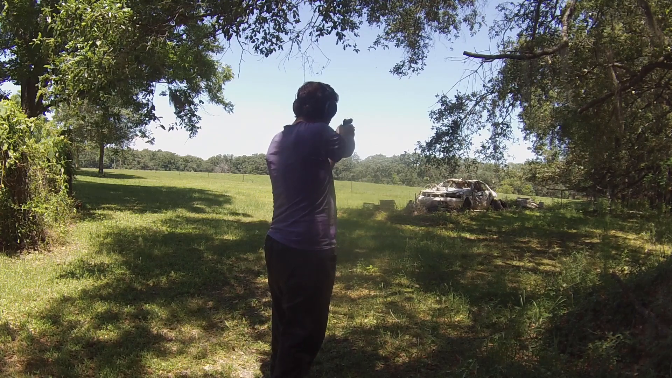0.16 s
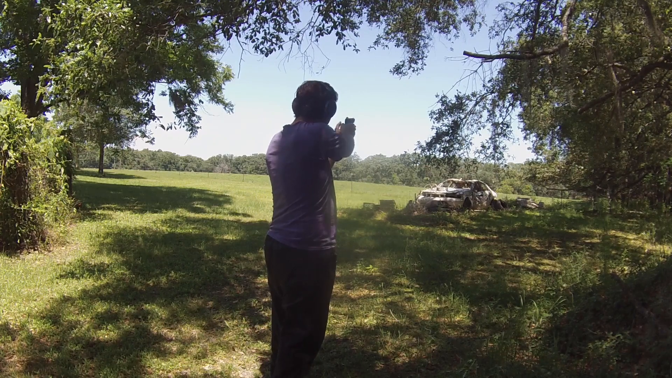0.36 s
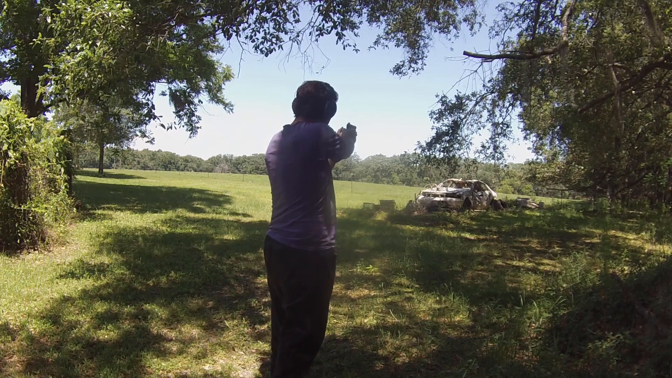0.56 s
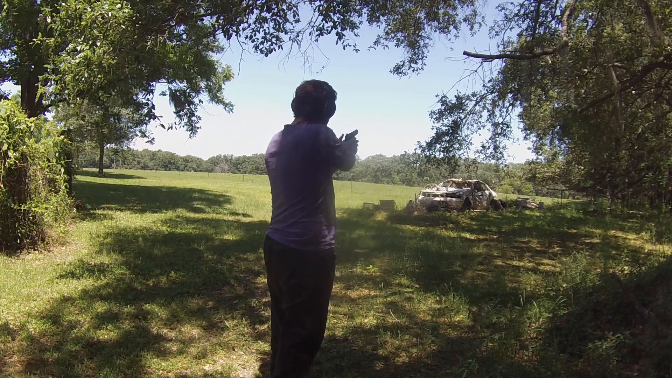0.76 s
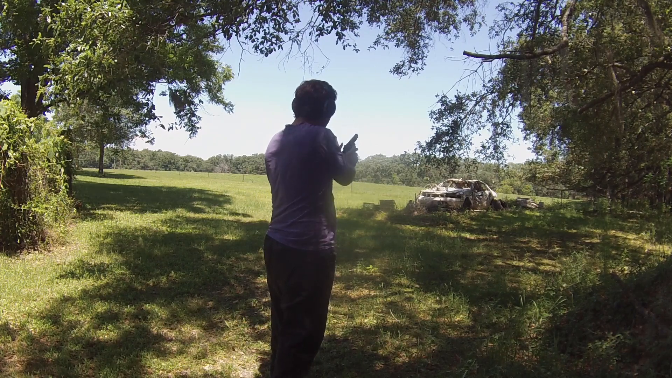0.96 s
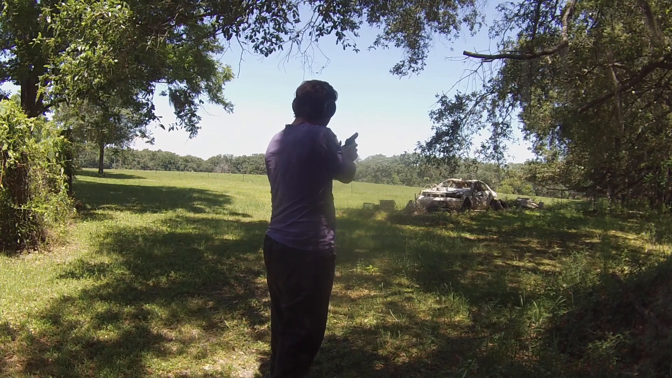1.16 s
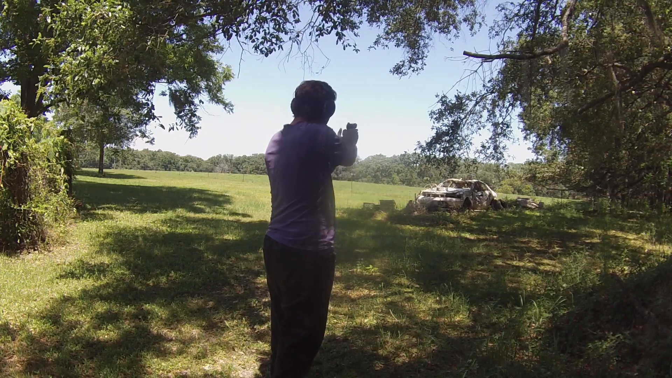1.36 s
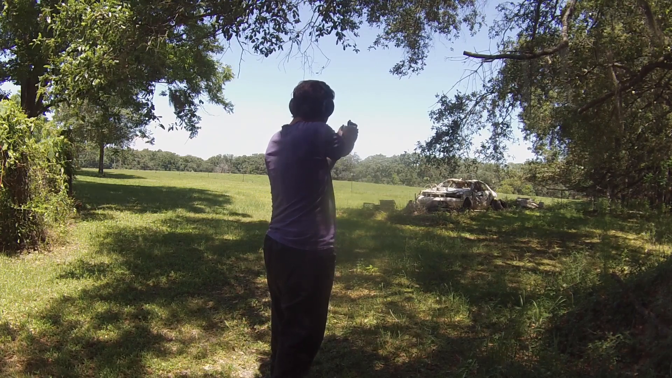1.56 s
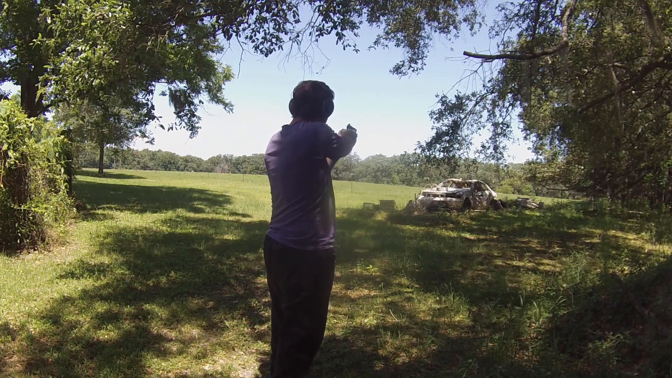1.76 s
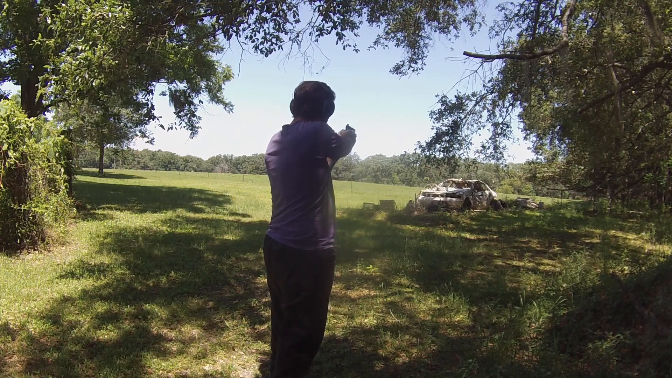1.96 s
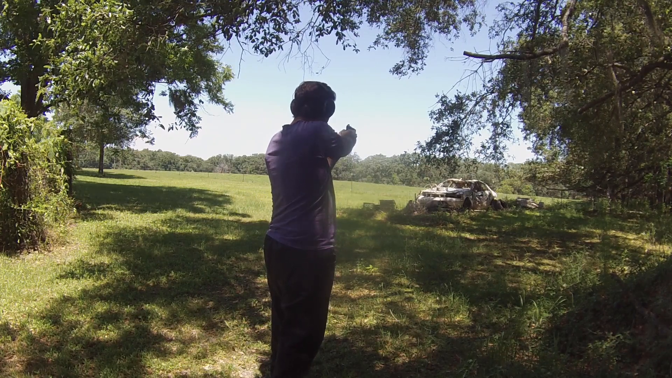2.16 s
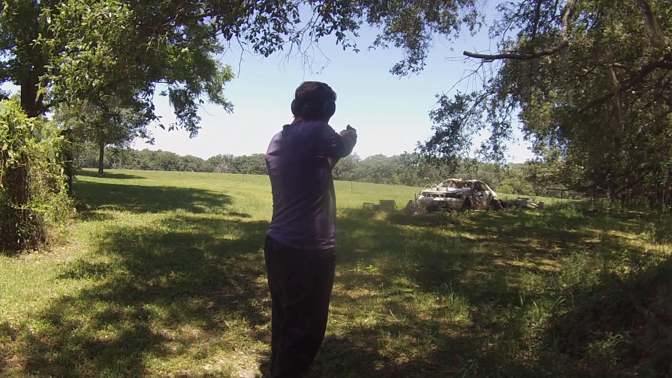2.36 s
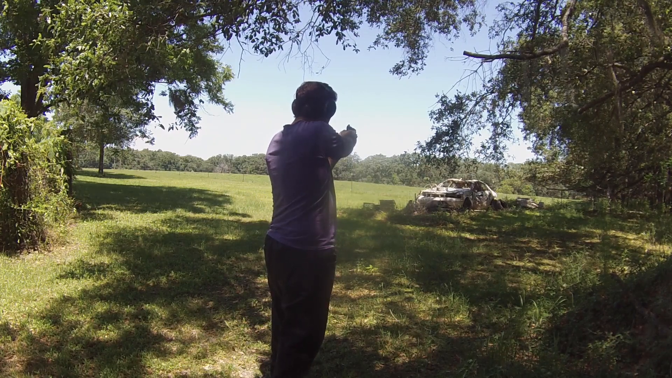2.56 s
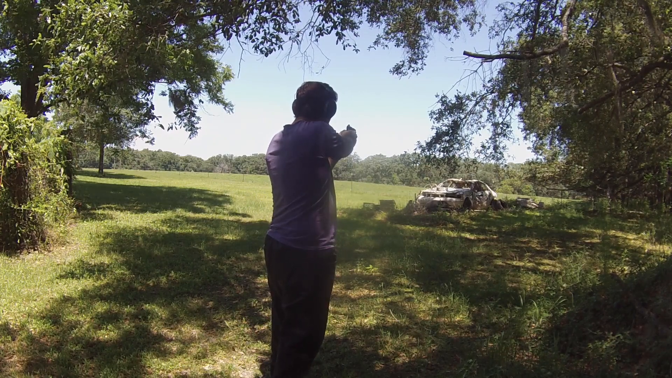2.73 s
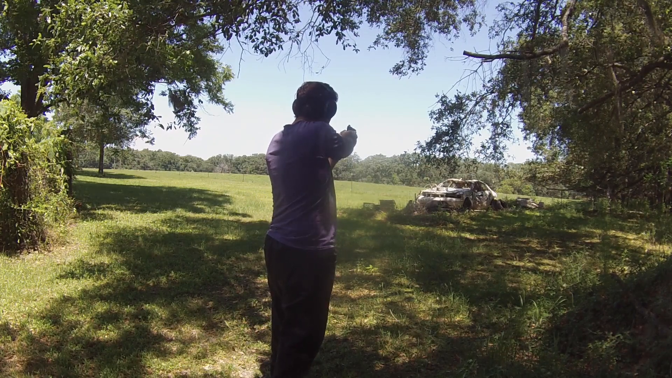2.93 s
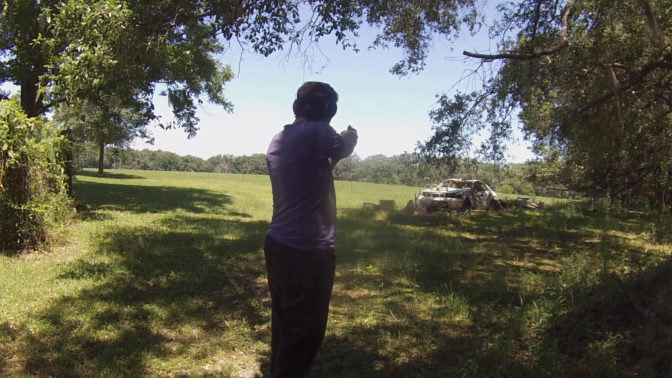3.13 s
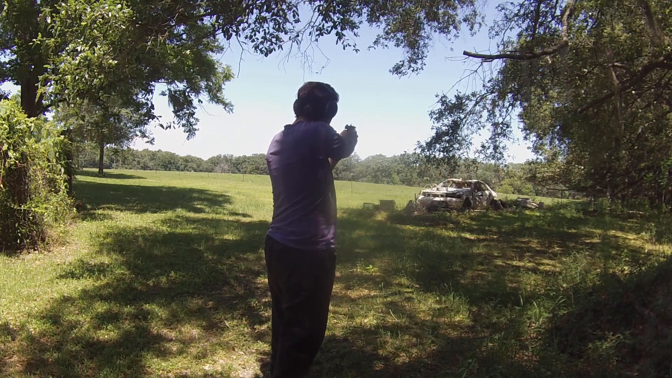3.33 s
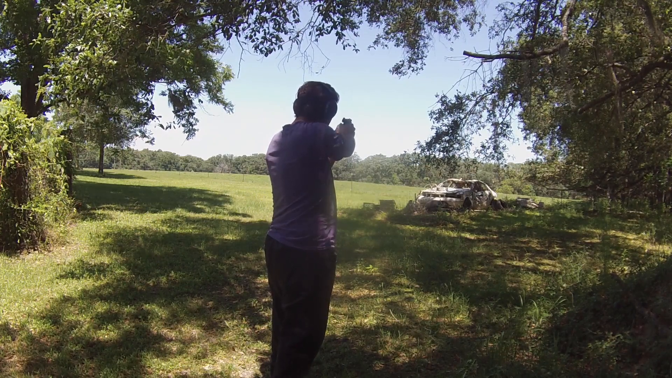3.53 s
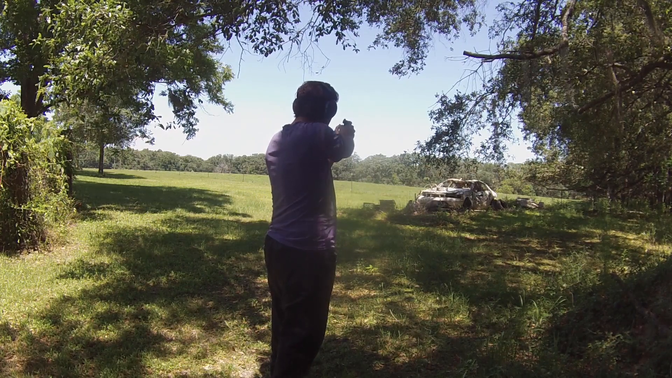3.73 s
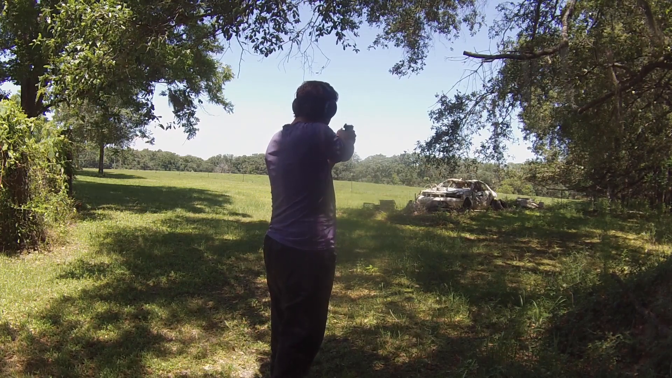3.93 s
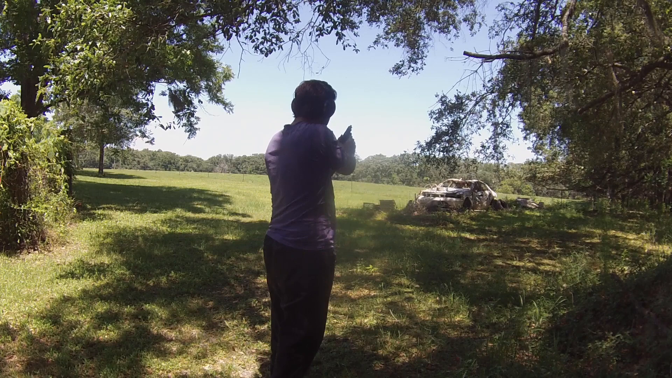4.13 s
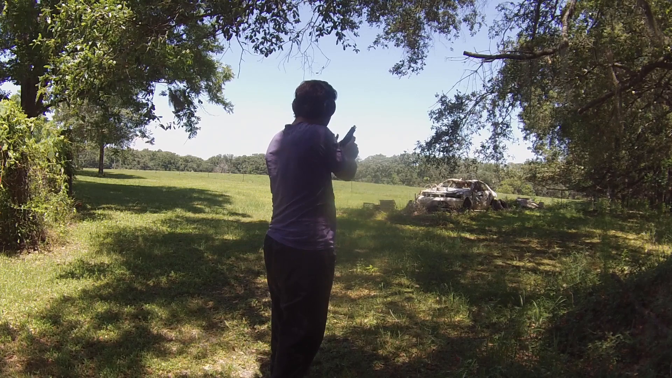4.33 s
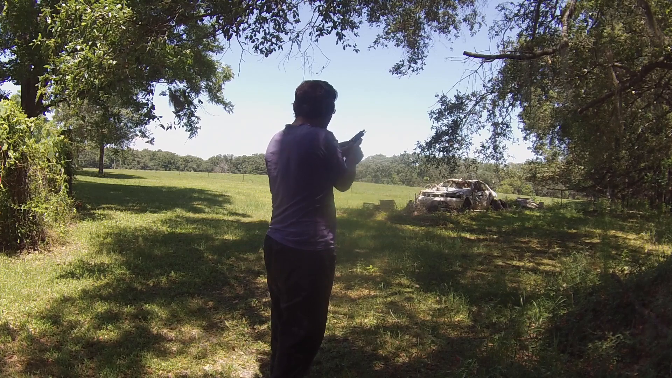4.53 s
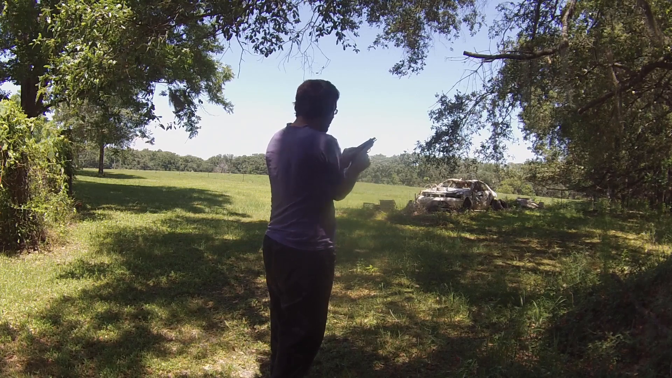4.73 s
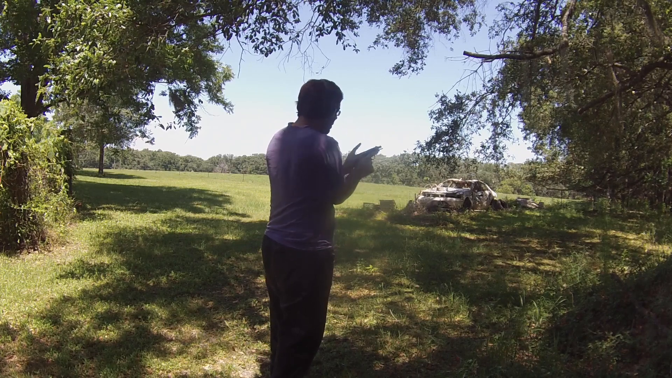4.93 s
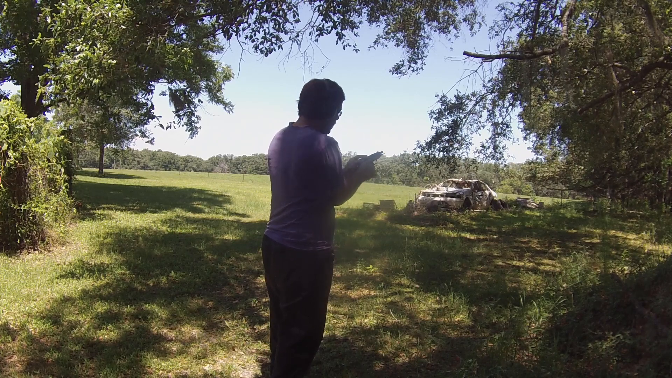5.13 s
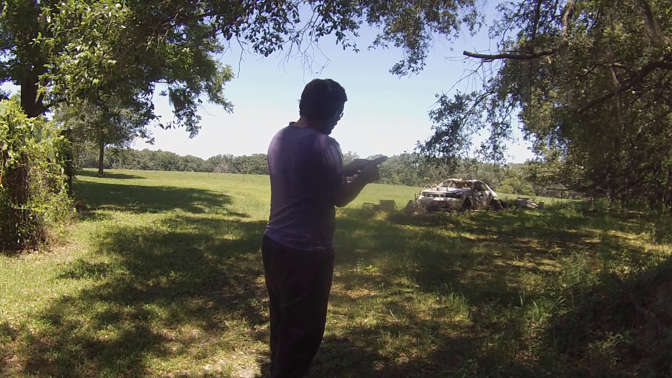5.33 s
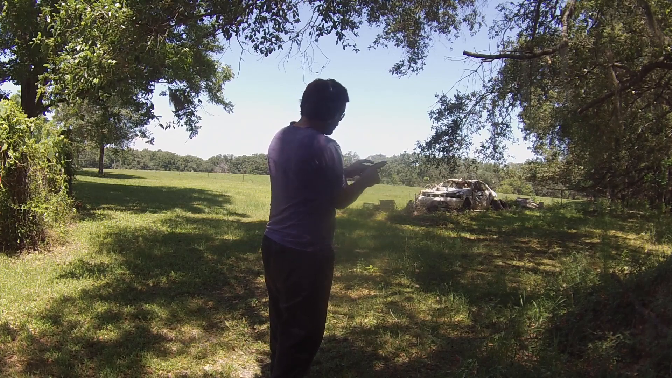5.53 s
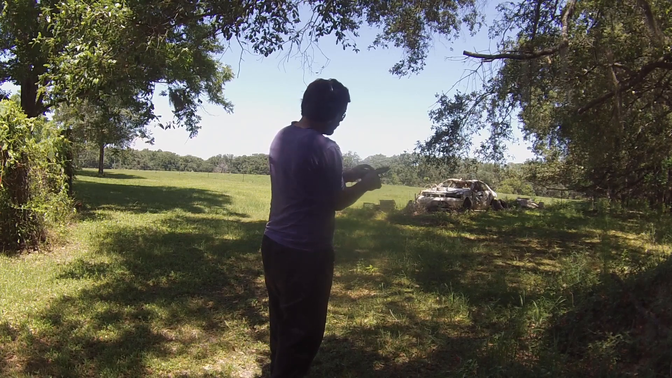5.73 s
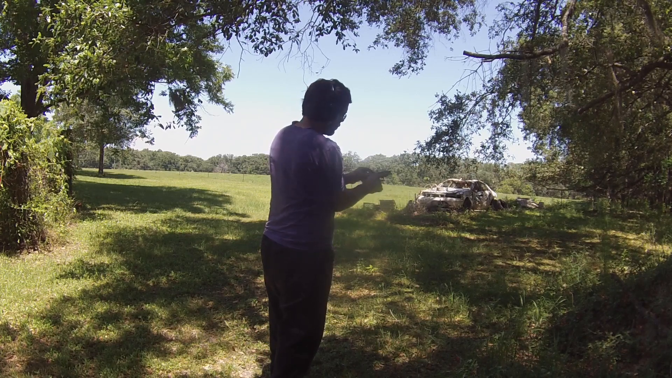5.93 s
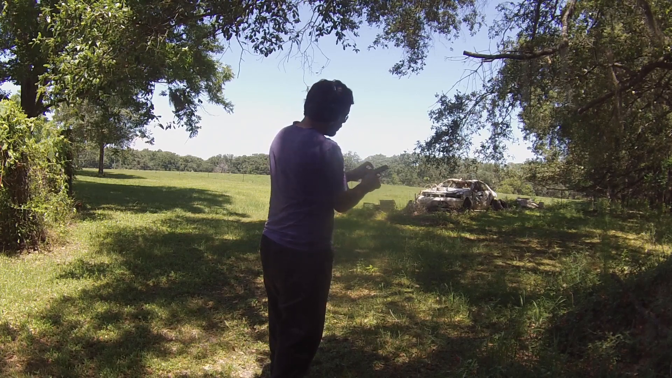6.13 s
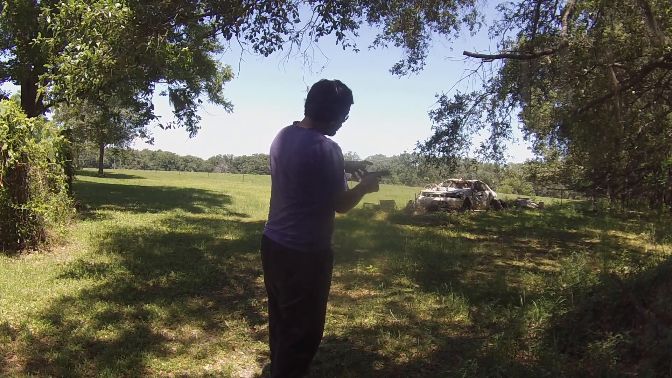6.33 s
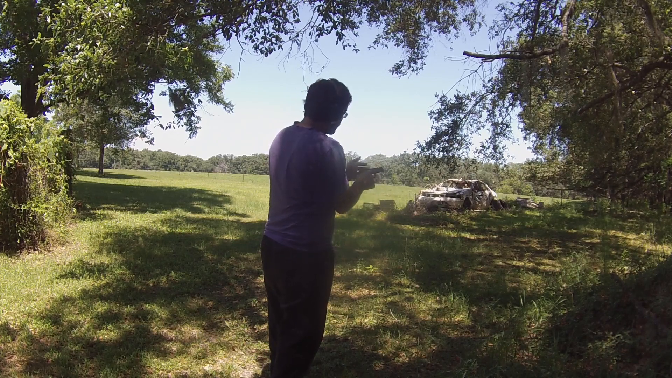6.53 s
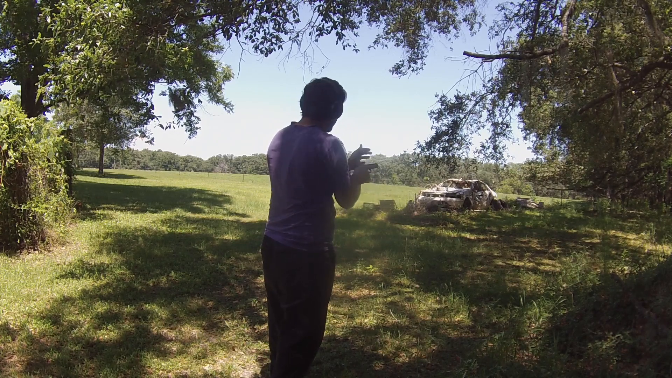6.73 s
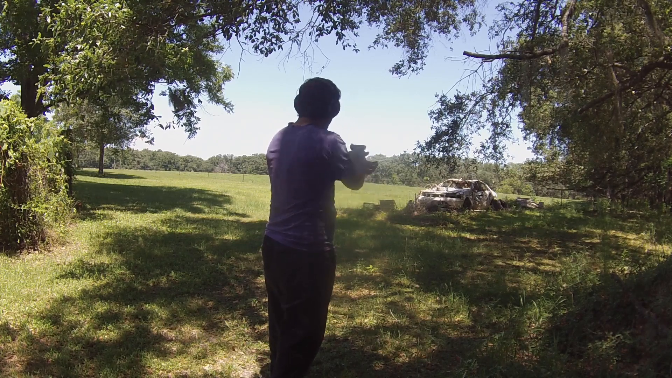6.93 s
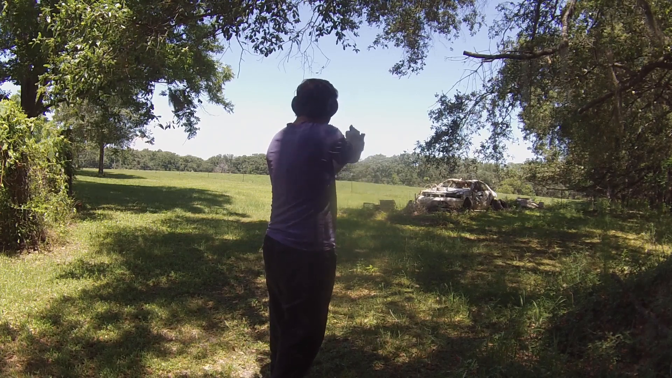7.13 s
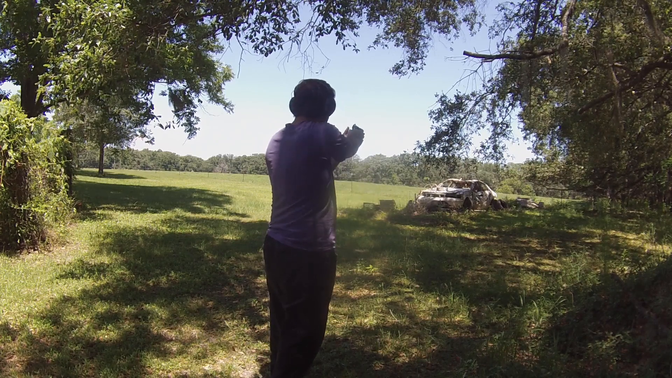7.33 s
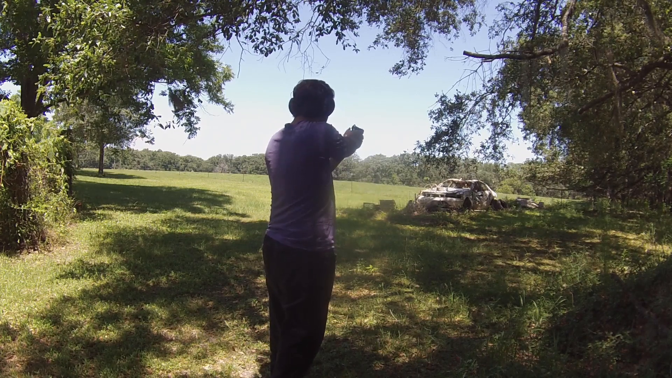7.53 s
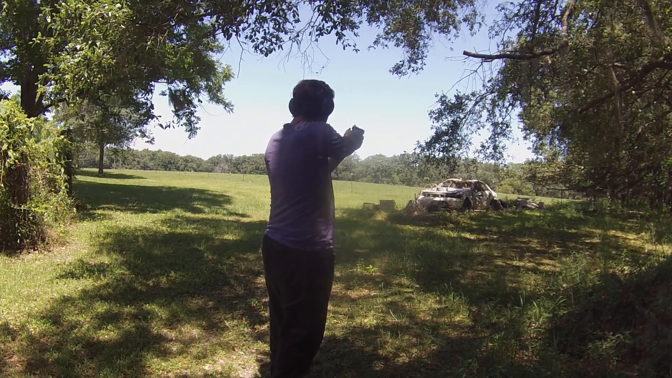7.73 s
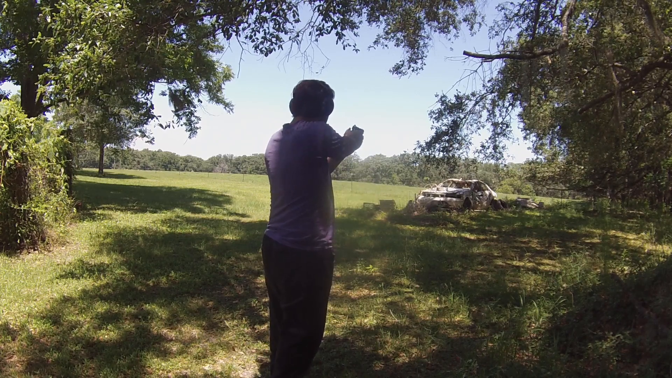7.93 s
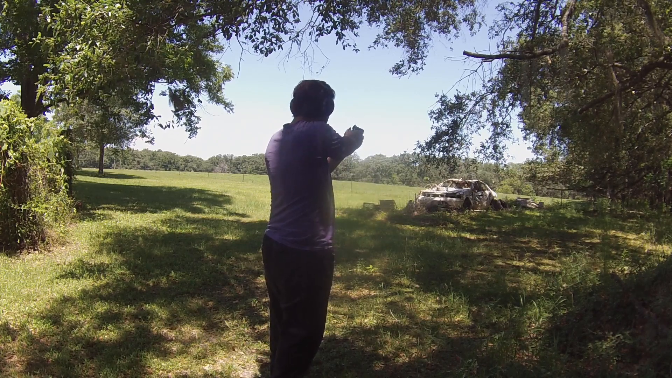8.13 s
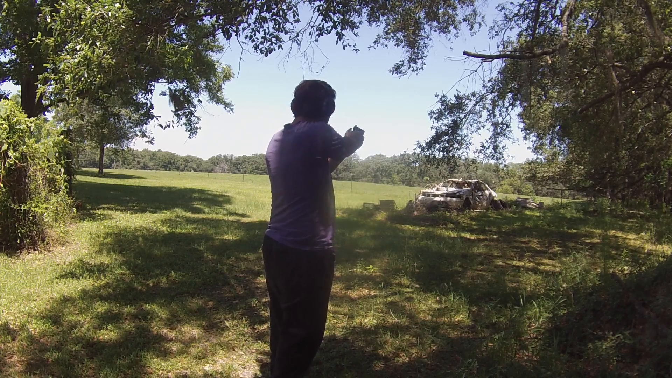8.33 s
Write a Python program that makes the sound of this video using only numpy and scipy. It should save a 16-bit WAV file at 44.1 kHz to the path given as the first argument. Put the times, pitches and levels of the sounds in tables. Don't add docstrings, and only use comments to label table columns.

```python
import sys
import numpy as np
from scipy import signal
from scipy.fft import rfft, irfft, next_fast_len
from scipy.io import wavfile
from scipy.ndimage import uniform_filter1d, map_coordinates

SR = 44100
rng = np.random.default_rng(int(sys.argv[2]) if len(sys.argv) > 2 else 0)


def put_to_file(sound):
    columns = np.atleast_2d(sound).T
    safe = np.clip(columns, -1, 1)
    whole_steps = np.round(safe * 32767)
    wavfile.write(sys.argv[1], SR, whole_steps.astype(np.int16))


def natural_amplitude(level_db):
    exponent = np.asarray(level_db, float) / 20
    return 10 ** exponent


N = 369558
T = np.arange(N) / SR


def unit(x):
    return x / np.sqrt(np.mean(x ** 2) + 1e-20)


def along(points, hz):
    f, v = np.transpose(points)
    return np.interp(np.log(hz + 1), np.log(f + 1), v)


def curve_db(rows, t):
    s, db = np.transpose(rows)
    return np.interp(t, s, db)


def wobble(knots_per_s):
    knots = rng.standard_normal(int(N * knots_per_s / SR) + 4)
    return map_coordinates(knots, [T * knots_per_s])


def filtered(x, response):
    m = next_fast_len(len(x) + 8192)
    return irfft(rfft(x, m) * response(np.fft.rfftfreq(m, 1 / SR)), m)[:len(x)]


def resonance(centre_hz, width_hz):
    return lambda f: 1j * f * width_hz / (centre_hz ** 2 - f * f + 1j * f * width_hz)


def noise(response):
    return unit(filtered(rng.standard_normal(N), response))


# (frequency [Hz], density [dB/Hz])
FLUTTER_COLOUR = [(10, -9.5), (25, 2), (45, -1.5), (70, -10.5), (110, -24), (200, -41.5), (400, -70),
                  (900, -120)]
# (time [s], level [dB])
BREEZE = [(0, -54), (.4, -54), (.7, -44.5), (1.5, -51.5), (2.2, -48.5), (3.2, -47), (3.6, -54),
          (4.1, -45.5), (4.4, -61), (6.2, -58), (6.9, -68), (8.38, -63)]
# (time [s], peak [dB])
PUFFS = [(.01, -50), (.6, -42.5), (.87, -35), (1.14, -32), (1.29, -42), (1.44, -40.5), (1.6, -45),
         (1.74, -43), (1.92, -44.5), (2.05, -43.5), (2.15, -40.5), (2.27, -42), (2.375, -36), (2.67, -41),
         (2.88, -40), (3.18, -36), (3.3, -45.5), (3.87, -36), (3.95, -32.5), (4.09, -35), (4.17, -37.5),
         (4.5, -44), (5.69, -54), (6.61, -52.5), (6.7, -51), (7.27, -44), (7.75, -53.5), (7.95, -54.5),
         (8.21, -55.5)]


def wind():
    puff_half_s, even_s = 0.029, .07
    flutter = noise(lambda f: natural_amplitude(along(FLUTTER_COLOUR, f)))
    flutter = flutter / np.sqrt(.1 + np.abs(uniform_filter1d(flutter ** 2, size=round(even_s * SR))))
    puffs = sum(natural_amplitude(db) * np.exp(-((T - s) / puff_half_s) ** 2) for s, db in PUFFS)
    return (natural_amplitude(curve_db(BREEZE, T)) + puffs) * unit(natural_amplitude(1.5 * wobble(17)) * flutter)


# (frequency [Hz], density [dB/Hz])
FIELD_COLOUR = [(12, -32.5), (22, -2.5), (65, -4), (104, -7), (134, -10.5), (260, -15), (376, -16.5),
                (950, -23), (3000, -30.5), (7060, -37.5), (8340, -40.5), (10800, -41), (11500, -46.5),
                (15000, -53)]


def field():
    field_db = -53.5
    return natural_amplitude(field_db - 1.5 + .5 * wobble(2)) * noise(lambda f: natural_amplitude(along(FIELD_COLOUR, f)))


def motor():
    level = natural_amplitude(-57.5 + 1.5 * wobble(2))
    speed_hz = 86 + 1.4 * wobble(4.3)
    return level * np.sin(2 * np.pi * np.cumsum(speed_hz) / SR)


# (time [s], length [s], level [dB])
BUZZ = [(.55, .6, -76.5), (1.6, .78, -75), (2.903, 0.67, -75.5), (4.9, .53, -73.5), (5.6, 1.3, -84),
        (7.4, .7, -87)]


def insects():
    swell_s, stop_s, resting_db = .3, .08, -90.5

    def stroke(hz):
        return np.cos(np.pi * np.cumsum(hz + 2.6 * wobble(4)) / SR) ** 2

    def chorus_colour(f):
        return resonance(9700, 900)(f) ** 2 + natural_amplitude(-7) * resonance(10700, 500)(f) ** 2

    singer = unit((.3 + stroke(61)) * noise(lambda f: resonance(7200, 700)(f) ** 2))
    chorus = unit((.8 + stroke(62.5)) * noise(chorus_colour))
    bouts = np.zeros(N)
    for s, length, db in BUZZ:
        swell = np.minimum((T - s) / swell_s, (s + length - T) / stop_s)
        bouts += natural_amplitude(db) * np.clip(swell, 0, 1)
    return (natural_amplitude(resting_db) + bouts) * singer + natural_amplitude(-76.5 + wobble(3.3)) * chorus


# (time [s], length [s], pitch [Hz], level [dB])
PEEPS = [
    (1.56, 0.0448, 9900, -73.5),
    (4.37, .08, 6500, -75),
    (4.57, .07, 6500, -71),
]


def bird():
    out = np.zeros(N)
    for s, length, hz, db in PEEPS:
        t = np.clip(T - s, 0, length)
        swell = np.sin(np.pi * t / length) ** .5
        out += natural_amplitude(db + 3) * swell * np.sin(2 * np.pi * hz * (t - .0003 * np.exp(-t / .008)))
    return out


# (time after first crackle [s], peak [dB], ring [Hz], contact [s], crack over ring [dB])
HAMMER = (-.004, -29, 3500, .0012, -4)
PLATE = [
    (.46, -27, 2000, .0007, -25),
    (.4614, -33.5, 5000, .001, -20),
]
# (time [s], peak [dB], ring [Hz], contact [s], crack over ring [dB])
SPRING = (1.384, -42, 5600, 0.6, -3)
# (time [s], peak [dB], ring [Hz], crack over ring [dB])
TRIGGER = [(.0662, -47.5, 7000, 2.5), (.0752, -46, 3003, 0.4), (.0815, -40.5, 5725, -2.5),
           (3.359, -47, 5004, -5), (3.363, -43.5, 5500, 1.1)]
# (time [s], peak [dB], ring [Hz], crack over ring [dB])
HANDLING = [(1.371, -42.5, 2973, -4), (1.3798, -21, 5760, -1.5), (1.3905, -35, 5780, -7),
            (1.595, -55.5, 3970, 6), (4.631, -27, 1510, 3), (4.632, -22, 2210, 1.5),
            (4.6338, -22.5, 4580, 4.5), (4.92, -58, 6474, -6), (4.985, -59.5, 12500, -6),
            (5.226, -38, 3522, 3.5), (5.229, -42, 4304, 5), (6.172, -35, 6800, .6), (6.179, -27, 4350, .2),
            (6.1817, -19.5, 4400, -3), (6.186, -28, 3412, 1.5), (6.189, -29, 3393, 2.2),
            (6.1947, -23, 2030, -3), (6.196, -23, 3200, 4), (6.2037, -23, 2800, 0), (6.209, -40, 4370, 2.2),
            (6.694, -28.5, 945, -18), (6.695, -39.5, 2590, -8), (6.699, -37, 2700, -10.5),
            (6.6992, -46.5, 4800, -9)]


def contacts():
    trigger_contact_s, handling_contact_s = .001, 0.00131
    touches = [SPRING]
    for start, _, _ in SHOTS:
        touches += [(start + s, *rest) for s, *rest in [HAMMER, *PLATE]]
    for rows, contact_s in [(TRIGGER, trigger_contact_s), (HANDLING, handling_contact_s)]:
        touches += [(s, db, hz, contact_s, crack_db) for s, db, hz, crack_db in rows]
    return touches


# (frequency [Hz], level [dB])
LEAF_COLOUR = [(1500, -13), (4000, -3), (6500, 1), (14000, 3.5)]
# (frequency [Hz], t60 [s])
LEAF_T60 = [(2000, .08), (4000, .2), (7000, 0.27), (14000, .25)]


def leaf_answer(struck):
    hz, t, z = signal.stft(struck, SR, nperseg=128)
    lag = t[:90]
    fade_db = along(LEAF_COLOUR, hz)[:, None] - 60 * lag / along(LEAF_T60, hz)[:, None]
    fade = natural_amplitude(fade_db) ** 2 * (lag > .003)
    energy = uniform_filter1d(np.abs(z) ** 2, size=5, axis=0)
    power = np.abs(signal.fftconvolve(energy, fade, axes=1)[:, :len(t)])
    fresh = signal.stft(rng.standard_normal(N), SR, nperseg=128)[2]
    return natural_amplitude(-19.0) * signal.istft(np.sqrt(power) * fresh / np.std(fresh), SR, nperseg=128)[1][:N]


# (frequency [Hz], level [dB])
STEEL = [(500, -33.5), (1000, -13.5), (2000, -2.5), (4500, -3), (7000, -2.5), (10000, -9.5), (15000, -19)]


def clicks():
    rise_s = 0.00033
    out, t = np.zeros(N), np.arange(2048) / SR
    for s, db, hz, contact_s, crack_db in contacts():
        ring = unit(filtered(rng.standard_normal(len(t)), lambda f: resonance(hz, .2 * hz)(f) ** 2))
        crack = unit(filtered(rng.standard_normal(len(t)), lambda f: natural_amplitude(along(STEEL, f))))
        u = t / max(contact_s, .0003)
        envelope = np.minimum(t / rise_s, 1) * np.sqrt(u) * np.exp(-u)
        out[round(s * SR):][:len(t)] += natural_amplitude(db - 4.0) * envelope * (ring + natural_amplitude(crack_db) * crack)
    return out + leaf_answer(out)


# (time after blast [s], level [dB])
ROLL = [(0, -23.5), (.1, -27.5), (.2, -27.5), (.41, -23.5), (.65, -33), (1.05, -43.5), (1.5, -53),
        (2.3, -64), (3.6, -80)]
# (time after blast [s], depth [s], roll [dB], foliage [dB], ground [dB])
STANDS = [(.012, .02, 0, 1, 5), (.058, .01, 2, -6, -1.5), (.08, 0.016, 0.5, 3.5, 1),
          (.13, 0.015, 3, -3.5, -8), (.33, 0.062, 0.4, 2, 7), (1.2, .09, 3, -3.5, -2),
          (1.7, .1, 0, 10.5, 8)]


def landscape(after):
    foliage_db, foliage_fade_db, foliage_s = 3, -11.5, .45
    ground_db, ground_fade_db_per_s, ground_ends_s = 2.5, -17, 0.95
    roll = curve_db(ROLL, after)
    foliage = foliage_db + foliage_fade_db * (1 - np.exp(-after.clip(0) / foliage_s))
    ground = ground_db + ground_fade_db_per_s * after.clip(0, ground_ends_s)
    stands = sum(np.outer(dbs, np.exp(-((after - s) / depth) ** 2)) for s, depth, *dbs in STANDS)
    return np.array([roll, foliage, ground]) + stands


# (frequency [Hz], density [dB/Hz])
ECHO_COLOUR = [(50, -32), (110, -13), (229, -14), (290, -16.5), (490, -1), (632, -2.5), (870, -1),
               (1250, -4.5), (1800, -11), (3500, -15.5), (7550, -18.5), (11000, -27), (14600, -37),
               (15900, -51.5)]
# (frequency [Hz], loss per path time [dB/s])
AIR_LOSS = [(2000, 0.5), (3000, -4), (5000, -22), (7500, -44.5), (10000, -67), (15000, -120)]
# (frequency [Hz], share of ground change)
GROUND_SHARE = [(130, .1), (250, 1), (400, 0.64), (600, 0)]
# (frequency [Hz], share of foliage change)
FOLIAGE_SHARE = [(1000, 0), (1700, 0.77), (2800, 0.96), (6000, 0.67), (15000, 0.24)]
# (time after blast [s], level over roll [dB])
SLAPS = [(.011, 4), (.054, 4.5), (.068, 4.5), (.083, 3), (.165, 10), (0.455, 5), (.48, 3.5), (0.596, 8)]


def echo():
    out = np.zeros(N)
    for _, _, end in SHOTS:
        lumps_db = 0.9 * wobble(250) + 1.1 * wobble(40)
        lumps_db += sum(db * np.exp(-((T - end - s) / 0.0012) ** 2) for s, db in SLAPS)
        hz, t, z = signal.stft(unit(natural_amplitude(lumps_db)) * rng.standard_normal(N), SR, nperseg=256)
        roll_db, foliage_db, ground_db = landscape(t - end)
        shape_db = along(ECHO_COLOUR, hz)[:, None] + 16.5 + roll_db
        shape_db += along(FOLIAGE_SHARE, hz)[:, None] * foliage_db
        shape_db += along(GROUND_SHARE, hz)[:, None] * ground_db
        shape_db += along(AIR_LOSS, hz)[:, None] * (t - end - .1).clip(-.1)
        out += (T > end) * signal.istft(z * natural_amplitude(shape_db), SR, nperseg=256)[1][:N]
    return out


# (first crackle [s], blast front [s], blast end [s])
SHOTS = [
    (.1052, .1074, .1103),
    (3.3925, 3.3947, 3.3975),
]


def blast():
    def rattle_colour(f):
        low = natural_amplitude(1.5) * resonance(1300, 1000)(f)
        return resonance(3500, 4500)(f) ** 2 + natural_amplitude(-17.5) * resonance(9800, 2000)(f) + low

    out = np.zeros(N)
    rattle = noise(rattle_colour)
    for start, front, end in SHOTS:
        rise = np.clip((T - start) / (front - start), 0, 1) * (T < front)
        out += natural_amplitude(4) * rise ** 1.5 * rattle
        push = np.sin(np.pi * np.clip((T - front) / (end - front), 0, 1)).clip(0)
        out -= natural_amplitude(16) * np.sqrt(push)
        after = np.clip(T - end, 0, 1)
        rebound = natural_amplitude(8.5 - 60 * after / 0.0029) + natural_amplitude(-17) * np.exp(-((after - .008) / .005) ** 2)
        rattle_level = natural_amplitude(-3.5 - 60 * after / 0.013) + natural_amplitude(-16.5 - 60 * after / 0.042)
        out += (T >= end) * (rebound + rattle_level * rattle)
    return out


def scene():
    mono = wind() + field() + motor() + insects() + bird() + clicks() + echo() + blast()
    return np.array([mono, mono])


def roll_off(x):
    return signal.sosfilt(signal.butter(12, 15400, fs=SR, output="sos"), x)


def record(dry):
    held = dry[0] / (1 + np.abs(dry[0] / 1.03) ** 6) ** (1 / 6)
    coupled = filtered(held, lambda f: 1j * f / (11 + 1j * f) / (1 + (f / 15300) ** 80))
    hiss = natural_amplitude(-79.0) * noise(lambda f: 1 / (1 + (f / 9000) ** 30) / (1 + (300 / (f + 1)) ** 4))
    side = hiss + natural_amplitude(-35.5) * filtered(held, lambda f: resonance(150, 200)(f) * 1j)
    mix = np.clip([coupled + side, coupled - side], -1, 1)
    return roll_off(mix)


dry = scene()
out = record(dry)
put_to_file(out)
```